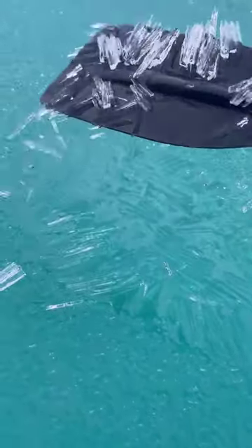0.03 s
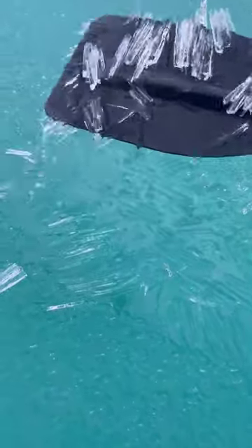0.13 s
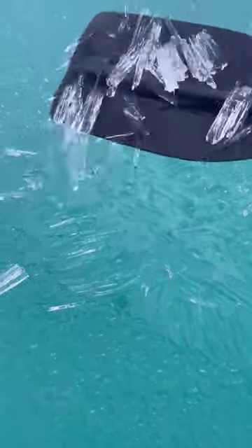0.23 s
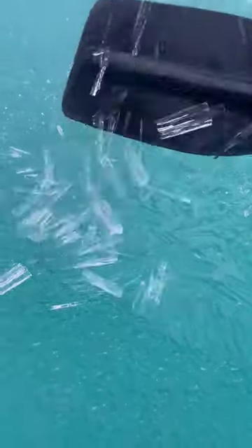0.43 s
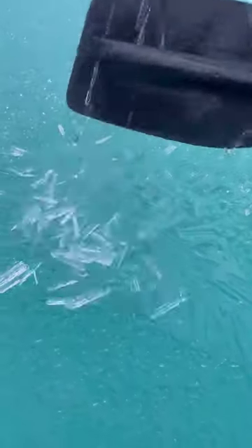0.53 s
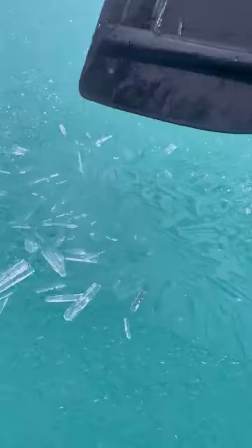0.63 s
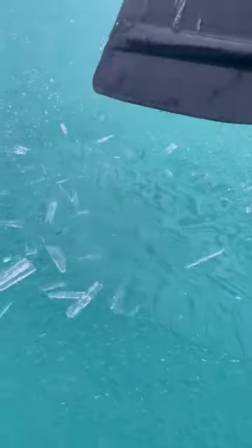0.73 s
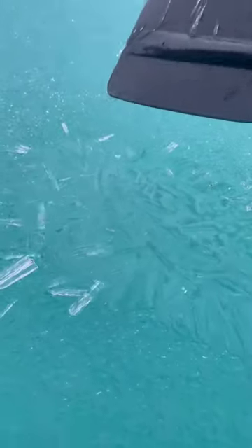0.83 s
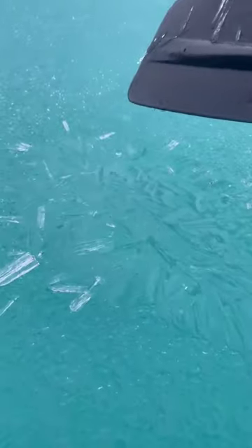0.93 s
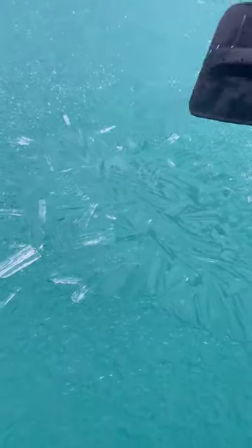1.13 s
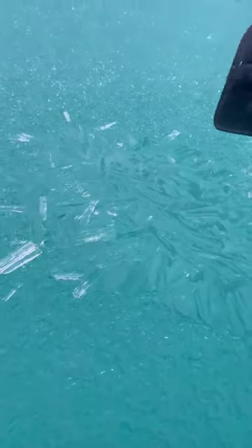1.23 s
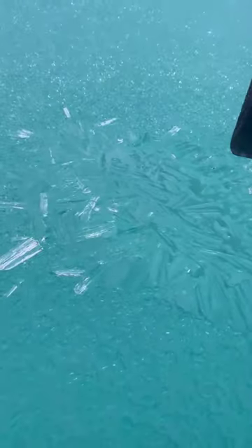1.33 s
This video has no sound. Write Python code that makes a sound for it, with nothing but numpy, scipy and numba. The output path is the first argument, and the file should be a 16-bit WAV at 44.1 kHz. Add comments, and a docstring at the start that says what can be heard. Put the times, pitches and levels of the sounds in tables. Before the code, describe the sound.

Thin ice needles slide off a paddle with a bright glassy crackle and clear pings, swelling as they patter into lake water, then thinning to a few clinks and near silence; close outdoor phone pickup.

```python
"""Thin ice needles slide off a lifted paddle, tinkle together and patter into a calm lake.
Close by, noise ticks and short decaying sines crackle in clusters that swell and die, with sharp cracks,
clear pings and a knocking shard. Below, rising sines make drops and bubbles. A phone with two ports
also hears soft bumps (low wavelets), a little wind (low noise) and the quiet lake air (wide hiss)."""
import sys
import numpy as np
from scipy import signal
from scipy.fft import rfft, irfft, next_fast_len
from scipy.io import wavfile
from numba import njit

SR = 44100
rng = np.random.default_rng(int(sys.argv[2]) if len(sys.argv) > 2 else 0)


def persist_wave(psi):
    """Save psi, clipped to +-1, as 16-bit WAV."""
    counts = np.round(np.clip(psi, -1, 1) * 32767).astype(np.int16)
    wavfile.write(sys.argv[1], SR, np.atleast_2d(counts).T)


N = 61739  # length in samples


def seconds():
    """Time of every sample, in seconds."""
    return np.arange(N) / SR


def undb(db):
    """Decibels to an amplitude factor."""
    return 10 ** (np.asarray(db, float) / 20)


def curve(table, t):
    """Straight lines between the points of a two-column table."""
    return np.interp(t, *np.array(table, float).T)


def colour(table, hz, axis=1):
    """One column of a table, read along the logarithm of the pitch in its first column."""
    table = np.array(table)
    return np.interp(np.log(np.maximum(hz, 10)), np.log(table[:, 0]), table[:, axis])


def rms(x):
    """Root mean square over all rows together."""
    return np.sqrt(np.mean(x ** 2))


def tint(x, table):
    """Filter by a colour table and set to rms 1."""
    gain = undb(colour(table, np.arange(N // 2 + 1) * SR / N))
    y = irfft(rfft(x) * gain, N)
    return y / rms(y)


@njit
def decay(n, start, step, t60, size, glide, attack, group):
    """Decaying sines with a soft start (times in samples); the pitch may rise as each one fades."""
    out = np.zeros((2, n))
    for k in range(len(start)):
        for i in range(start[k], min(n, start[k] + int(t60[k]))):
            u = i - start[k]
            envelope = (1 - np.exp(-u / attack)) * 1000. ** (-u / t60[k])
            phase = step[k] * u * (1 + glide * u / t60[k])
            out[group[k], i] += size[k] * envelope * np.sin(phase)
    return out


def rings(t, hz, t60, db, glide=0., attack_s=0.00022):
    """Decaying rings shared in turn between near and far pieces (the two rows)."""
    start = (t * SR).astype(int)
    near_or_far = np.arange(len(t)) % 2
    return decay(N, start, 2 * np.pi * hz / SR, t60 * SR, undb(db), glide, attack_s * SR, near_or_far)


def swarm(per_s, table, scatter_db):
    """Random moments, evenly spread pitches, sizes from a colour table with a few big ones, a free draw."""
    when, where, size, free = rng.random((int(per_s * N / SR), 4)).T
    hz = table[0][0] + (table[-1][0] - table[0][0]) * where
    extra_db = np.minimum(-scatter_db * np.log(size), 13)  # at most 13 dB
    return when * N / SR, hz, colour(table, hz) + extra_db, free


# Moments when a clump of needles hits the lake. Each row: centre in seconds, shower level in dB before
# the mix, length in seconds, splash in dB against that level.
CLUMPS = [(.012, -31, .012, -17), (.056, -33, .012, -18), (.093, -41, .008, -14), (.151, -38, .006, -16),
          (.164, -30, .006, -17), (.191, -29, .004, -12), (.212, -27, .010, -20), (.222, -26, .010, -21),
          (.255, -31, .006, -14), (.274, -33, .004, -20), (.289, -33, .006, -20), (.310, -38, .008, -6),
          (.322, -31, .008, -16), (.346, -25, .011, -20), (.368, -26, .012, -14), (.385, -28, .006, -10),
          (.418, -26, .006, -14), (.44, -24, .01, -14), (.472, -23, .01, -16), (.500, -16, .009, -26),
          (.514, -17, .012, -22), (.534, -21, .012, -27), (.546, -21, .004, -27), (.568, -25, .005, -18),
          (.605, -22, .012, -20), (.618, -21, .008, -20), (.635, -17, .013, -18), (.674, -23, .008, -24),
          (.716, -26, .012, -23), (.742, -27, .008, -20), (.816, -30, .006, -23), (.829, -30, .008, -23),
          (.870, -35, .005, -22), (.917, -36, .008, -18), (.931, -35, .004, -23), (.939, -33, .003, -25),
          (.977, -42, .004, -20), (1.023, -39, .005, -14), (1.031, -43, .004, -14), (1.053, -46, .004, -23),
          (1.089, -56, .004, -20), (1.13, -66, .006, -3), (1.165, -67, .006, -2), (1.23, -66, .008, -1),
          (1.298, -66, .004, -3)]


def flow(table, splash=False):
    """Gain from a steady level plus, in power, a hump per clump (steep rise, rounder fall)."""
    t = seconds()
    power = undb(curve(table, t)) ** 2
    for at, db, length, wet_db in CLUMPS:
        u = (t - at) / length * 2
        hump = np.exp(-np.where(u < 0, u ** 6, u ** 2))
        power = power + undb(db + splash * wet_db) ** 2 * hump
    return np.sqrt(power)


# The steady shower off the paddle. Each row: time in seconds, level in dB before the mix.
SHOWER = [(0, -26), (.04, -35), (.13, -38.5), (.25, -32), (.33, -30), (.345, -23), (.4, -24), (.48, -19.5),
          (.545, -22), (.56, -22.5), (.64, -18.5), (.652, -24), (.75, -29.5), (.79, -34.5), (.85, -36),
          (.9, -41.5), (.948, -33.5), (.953, -49.5), (1.01, -46.5), (1.07, -55), (1.11, -65.5), (1.2, -77)]
# Colour of the needles close by. Each row: pitch in Hz, relative density in dB per Hz.
ICE = [(1200, -25), (2000, -9.5), (3000, -10.5), (4700, -3), (6500, -2), (8200, -5.5), (9000, 3.5),
       (10300, 2.5), (11500, 1), (12700, -8)]
TICKS_PER_S, TICK_SCATTER_DB, TICK_TOP_DB = 2500, 4.5, 12
TICK_CUBE_TAIL_S = .00025  # time constant of the cubed rattle
RINGS_PER_S, RING_SCATTER_DB = 5000, 3.6
RING_OVER_TICKS_DB = 2.5
RING_T60_MIN_S, RING_T60_SPAN_S = .013 * .4, .013 * 2  # shortest ring, and random extra up to this


def shower():
    """Dry ticks with a brief rattle make a fine crackle; short glassy rings sparkle in it."""
    chance, noise, size = np.moveaxis(rng.random((2, N, 3)), -1, 0)
    tick_db = np.minimum(-TICK_SCATTER_DB * np.log(size), TICK_TOP_DB)
    hits = (chance < TICKS_PER_S / SR) * undb(tick_db)
    # summing cubes lets the bigger of two overlapping ticks dominate
    keep = np.exp(-1 / (TICK_CUBE_TAIL_S * SR))
    rattle = signal.lfilter([1], [1, -keep], hits ** 3) ** (1 / 3)
    ticks = tint(rattle * (noise - .5), ICE)
    t, hz, db, v = swarm(RINGS_PER_S, ICE, RING_SCATTER_DB)
    glass = rings(t, hz, RING_T60_MIN_S + RING_T60_SPAN_S * v, db)
    sparkle = undb(RING_OVER_TICKS_DB) * glass / rms(glass)
    return (ticks + sparkle) * flow(SHOWER) / 2


# Treble of the falling ice: the last, finest splinters are brighter.
# Each row: time in seconds, lift in dB of the treble.
FINE_DB = [(0, -4.5), (.6, -1), (.95, 3.5), (1.1, 3)]
FINE_HZ = 7640  # the lift acts above this


def brighten(fall):
    """Split off the treble without delay and change its level over time."""
    high = signal.butter(2, FINE_HZ, "high", fs=SR, output="sos")
    fine = signal.sosfiltfilt(high, fall)
    return fall + fine * (undb(curve(FINE_DB, seconds())) - 1)


# Sharp cracks of single shards. Each row: start in seconds, level in dB before the mix.
CRACKS = [(.0505, -27), (.162, -31), (.189, -25), (.2078, -29), (.2205, -23), (.2535, -29), (.4995, -17),
          (.5305, -14), (.9155, -31), (1.129, -55), (1.2, -60), (1.231, -57), (1.27, -61), (1.287, -59)]
# Colour of a crack. Each row: pitch in Hz, relative level in dB.
CRACK_BODY = [(300, -30), (900, -6), (2500, -8), (10000, 0), (12300, -8), (13000, -40)]
CRACK_RISE_S = .0005  # start to peak, and time constant of the tail


def cracks():
    """Each crack is a quick puff of noise, broad in colour, in turn from near and far."""
    t, puffs = seconds(), np.zeros((2, N))
    for k, (at, db) in enumerate(CRACKS):
        u = np.maximum(t - at, 0) / CRACK_RISE_S
        puffs[k % 2] += undb(db) * u * np.exp(1 - u)
    return puffs * tint(rng.standard_normal((2, N)), CRACK_BODY)


# Single clear pings. Each row: start in seconds, level in dB before panning, pitch in Hz, t60 in seconds.
PINGS = [(.004, -30, 7800, .04), (.051, -25, 9100, .012), (.224, -25, 7100, .03), (.272, -27, 7580, .015),
         (.317, -26, 4640, .03), (.325, -28, 6700, .03), (.377, -27, 2950, .03), (.451, -17, 9300, .012),
         (.545, -13, 10200, .012), (.497, -14, 8950, .02), (.512, -16, 4750, .035), (.576, -24, 4100, .03),
         (.615, -22, 4250, .04), (.672, -22, 6900, .02), (.706, -24, 6750, .03), (.75, -26, 7630, .03),
         (.814, -26, 8870, .015), (.912, -35, 4030, .08), (.914, -40, 1800, .04), (.913, -24, 10200, .05),
         (.915, -28, 8800, .02), (.928, -26, 10200, .03), (.937, -23, 10200, .015), (.937, -33, 5200, .06),
         (1.042, -52, 4700, .12), (1.05, -46, 9300, .02), (1.058, -47, 9000, .03), (1.117, -58, 5400, .02),
         (1.129, -55, 4600, .025), (1.138, -55, 3900, .02), (1.198, -56, 4500, .02)]
# Modes of one shard. Each row: pitch in Hz, relative level in dB, t60 in seconds.
SHARD = [(6090, 0, .045), (9200, -13, .015), (11900, -16, .02)]
# Knocks of that shard. Each row: start in seconds, level in dB before panning.
KNOCKS = [(.838, -29), (.847, -28), (.855, -32), (.868, -33), (.890, -38), (.902, -38), (.914, -37),
          (.944, -28), (.970, -40), (.977, -36), (1.021, -31), (1.027, -34)]
CLINK_OWN_SIDE, CLINK_OTHER_SIDE = .85, .65  # gains


def clinks():
    """Single pings, and a shard with nearly the same modes at every knock; each ring leans to one side."""
    t, db, hz, t60 = np.array(PINGS, float).T
    pings = rings(t, hz, t60, db)
    t, db = np.array(KNOCKS, float).T
    hz, mode_db, t60 = np.array(SHARD, float).T
    # each knock shifts its modes a little: deviations of 0.3 % in pitch and 1 dB in level
    vary = rng.standard_normal((len(t), len(hz), 2)) * [.003, 1]
    knock_hz = (hz * (1 + vary[..., 0])).ravel()
    knock_db = (db[:, None] + mode_db + vary[..., 1]).ravel()
    shard = rings(np.repeat(t, len(hz)), knock_hz, np.tile(t60, len(t)), knock_db)
    both = pings + shard
    return CLINK_OWN_SIDE * both + CLINK_OTHER_SIDE * both[::-1]


# Steady patter on the lake below the paddle. Each row: time in seconds, level in dB before the mix.
SPLASH = [(0, -47.5), (.12, -47), (.3, -40), (.35, -33.5), (.48, -35), (.56, -43.5), (.65, -41.5),
          (.76, -50.5), (.8, -54), (.95, -64.5), (1.05, -87.5), (1.2, -82.5)]
# Colour of the drops. Each row: pitch in Hz, relative density in dB per Hz.
WATER = [(150, -12.5), (300, -17.5), (600, -8), (900, 1.5), (1800, -1), (2600, 11.5)]
# Single bubbles. Each row: start in seconds, level in dB before the mix, start pitch in Hz, t60 in seconds.
BUBBLES = [(.010, -42, 580, .05), (.188, -41, 750, .015), (.305, -35, 720, .035), (.383, -39, 680, .03),
           (.627, -36, 850, .025), (1.026, -36, 1700, .025)]
DROPS_PER_S, DROP_SCATTER_DB = 4000, 2.2
DROP_MIN_CYCLES, DROP_SPAN_CYCLES = 7.5 * .32, 7.5 * 1.75  # shortest t60, and random extra up to this
DROP_GLIDE, BUBBLE_GLIDE = .2, .45  # the pitch ends higher by twice this fraction


def splash():
    """Drops of a few cycles that glide up, and single rounder bubbles."""
    t, hz, db, v = swarm(DROPS_PER_S, WATER, DROP_SCATTER_DB)
    t60 = (DROP_MIN_CYCLES + DROP_SPAN_CYCLES * v) / hz
    even_db = db + 10 * np.log10(hz)  # makes up for the shorter high drops
    drops = rings(t, hz, t60, even_db, glide=DROP_GLIDE, attack_s=0.00091)
    patter = drops / (np.sqrt(2) * rms(drops)) * flow(SPLASH, splash=True)
    t, db, hz, t60 = np.array(BUBBLES, float).T
    return patter + rings(t, hz, t60, db, glide=BUBBLE_GLIDE, attack_s=0.00037)


# Soft bumps right on the phone. Each row: centre in seconds, peak in dB at the left port, pitch in Hz,
# length in seconds.
BUMPS = [(0.028, -48.5, 50, 0.033), (0.053, -46.5, 61.4, 0.053), (0.151, -56.5, 81, .04),
         (0.255, -40, 59, 0.021), (.45, -56, 197, 0.05), (0.957, -47.5, 151, 0.0086),
         (0.976, -47.5, 85, .027), (1.04, -35, 198, 0.014), (1.085, -56, 142, .023),
         (1.155, -53, 202, 0.0041), (1.298, -48, 250, 0.0045)]
BUMP_PAN_DB, BUMP_LAG_S = 3, .0025


def bumps():
    """Low rounded wavelets, stronger at the left port and a little late at the right."""
    t = seconds() - np.array([[0], [BUMP_LAG_S]])
    out = 0
    for at, db, hz, length in BUMPS:
        hump = np.exp(-((t - at) / length * 2) ** 2)
        out = out + undb(db) * hump * np.cos(2 * np.pi * hz * (t - at))
    return out * undb([[0], [-BUMP_PAN_DB]])


# Faint wind at the phone's ports. Each row: time in seconds, level in dB before the ports are mixed.
RUMBLE = [(0, -64.5), (.3, -74), (.45, -58), (.52, -83), (.58, -66.5), (.64, -100), (.75, -82),
          (.92, -72.5), (1.1, -60.5), (1.2, -88), (1.4, -99)]
# Lower and upper edge of the wind band, in Hz.
RUMBLE_HZ = 51.4, 198


def rumble():
    """Low flutter of moving air: band noise, partly unlike at the two ports."""
    band = signal.butter(2, RUMBLE_HZ, "band", fs=SR, output="sos")
    a, b = signal.sosfilt(band, rng.standard_normal((2, N)))
    two_ports = np.array([1.2 * (a + .7 * b), a - .7 * b])
    return two_ports / np.std(a) * undb(curve(RUMBLE, seconds()))


# Colour of the open lake air all around. Each row: pitch in Hz, relative density in dB per Hz.
AIR = [(40, -57.5), (100, -16), (311, -11.5), (566, -16), (934, -14.5), (1620, -17), (2610, -21),
       (9450, -31), (12000, -61), (13000, -76.5)]
# The air fading slightly. Each row: time in seconds, level in dB before widening.
AIR_DB = [(1.1, -64), (1.4, -67.5)]


def air():
    """Faint wide hiss of the open lake: sum and difference of two noises."""
    a, b = tint(rng.standard_normal((2, N)), AIR) * undb(curve(AIR_DB, seconds()))
    return np.array([a + b, a - 1.08 * b])


# The phone's two microphone ports. Each row: pitch in Hz, lead of the left in radians, spread between
# near and far pieces in radians, left over right in dB.
PORTS = [(350, .8, 1, 0.5), (670, 0.59, 0.68, 3.5), (1000, 1.73, .5, 0.5), (1310, 1.41, 0.98, 1.5),
         (2695, 2.95, 0.27, 0.5), (3310, 10.2, 2, 7.5), (4140, 8.4, 1.2, -4), (4940, 14, 2, 6.5),
         (6100, 6.54, 1.38, -1), (7040, 6.7, 1.2, -1), (9430, 7.86, 1.1, 4), (9250, 8.84, 0.2, -3.5),
         (10900, 5.64, 1.9, 1.5), (11900, 9.5, 0.84, -0.5), (12300, 5.9, 1, 0.5)]


def ports(near, far):
    """Both ports hear near and far pieces, the right one with a phase turn set by pitch and place."""
    n = next_fast_len(N + SR // 10)  # spare room so that delays do not wrap
    hz = np.arange(n // 2 + 1) * SR / n
    lead, spread = colour(PORTS, hz), colour(PORTS, hz, axis=2)
    pan = undb(colour(PORTS, hz, axis=3) / 2)
    a, b = rfft(near, n), rfft(far, n)
    left = a + b
    right = (a * np.exp(1j * spread) + b * np.exp(-1j * spread)) * np.exp(-1j * lead)
    return irfft(np.array([left * pan, right / pan]), n)[:, :N]


def scene():
    """Ice and water reach the ports from near and far; the other layers are already left and right."""
    fall = brighten(shower())
    low_cut = signal.butter(3, 220, "high", fs=SR, output="sos")
    ice = signal.sosfilt(low_cut, fall + cracks() + splash())
    return ports(*ice) + clinks() + bumps() + air() + rumble()


def record(dry):
    """The phone cuts the top steeply above 12700 Hz."""
    top_cut = signal.ellip(10, .2, 80, 12700, fs=SR, output="sos")
    return signal.sosfilt(top_cut, dry)


dry = scene()
out = record(dry)
persist_wave(out)
```